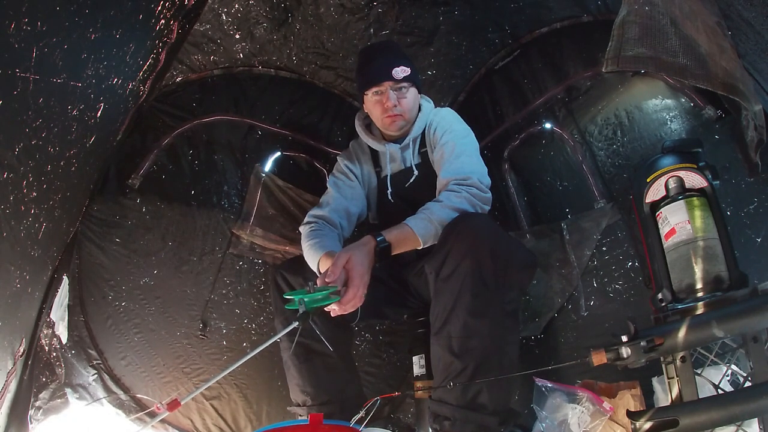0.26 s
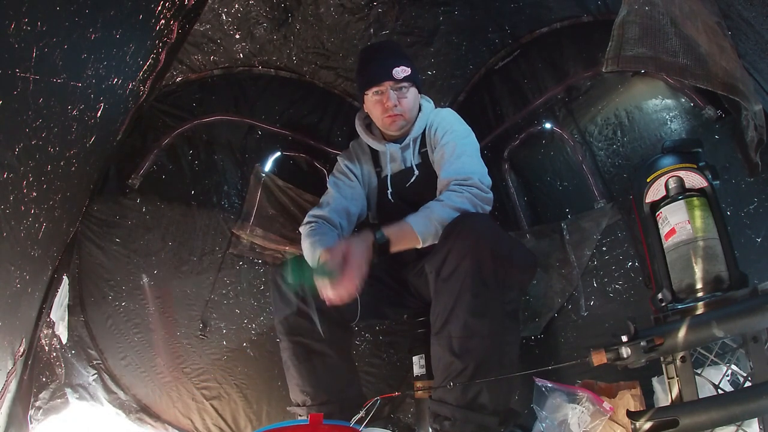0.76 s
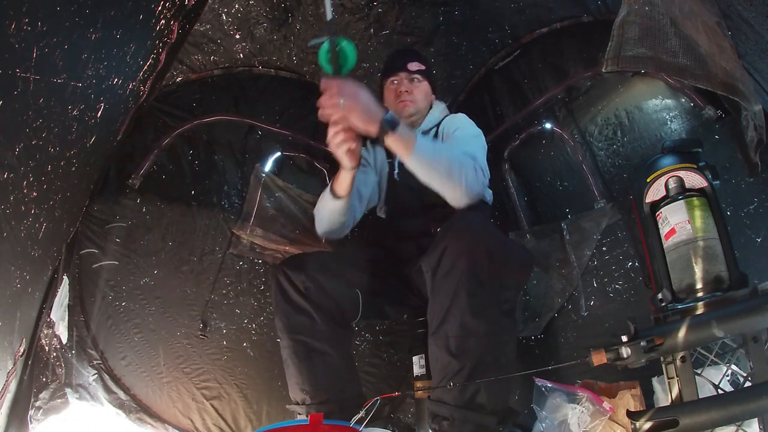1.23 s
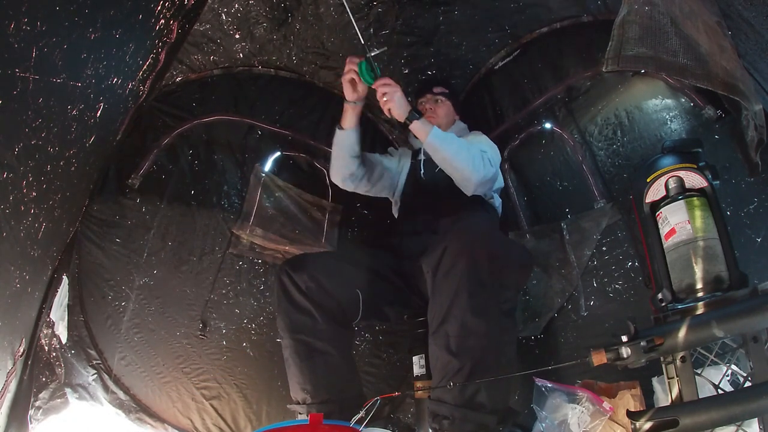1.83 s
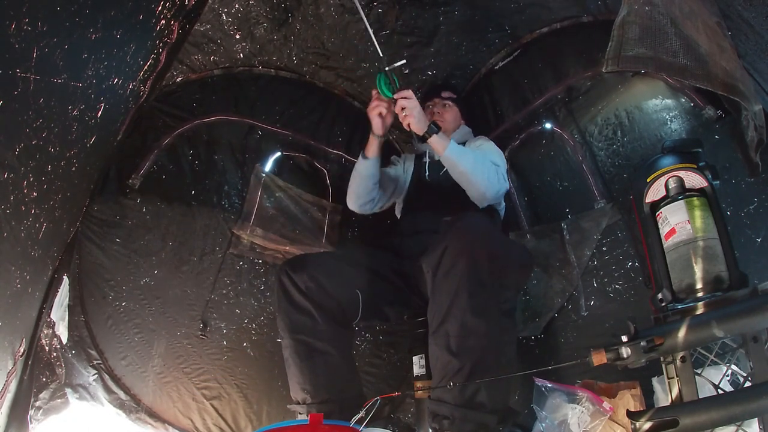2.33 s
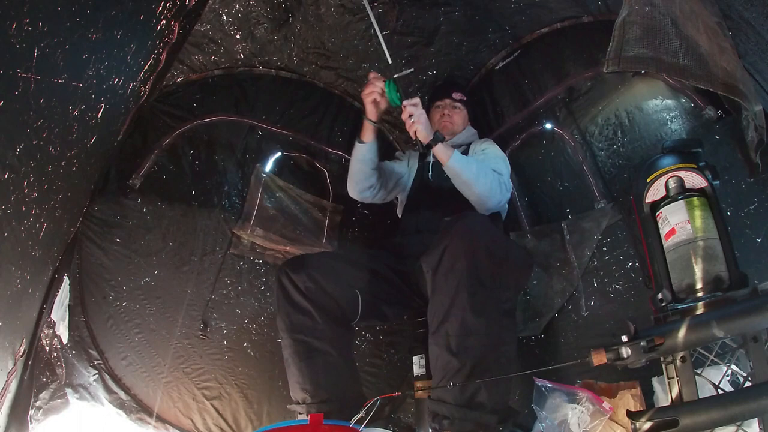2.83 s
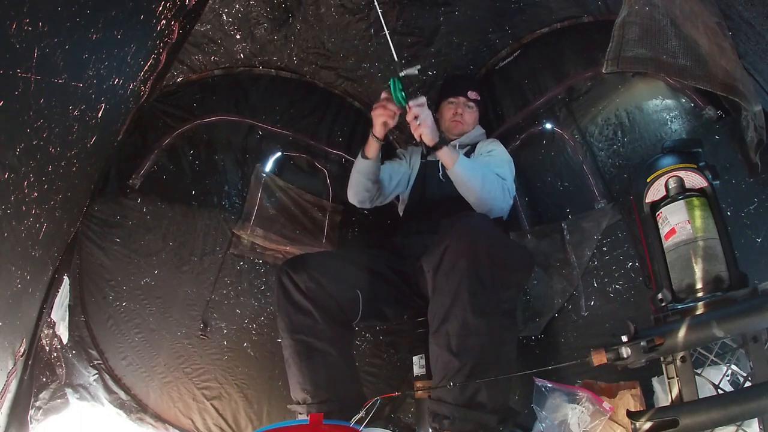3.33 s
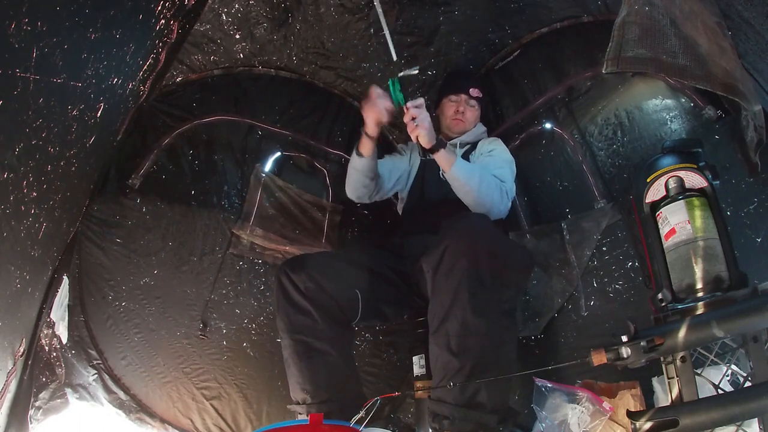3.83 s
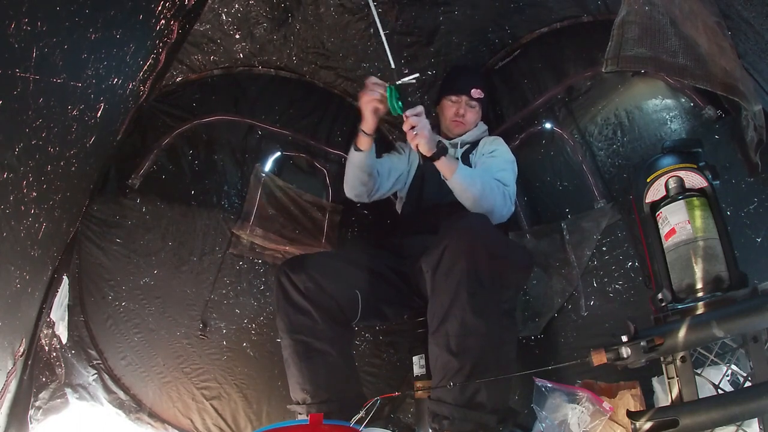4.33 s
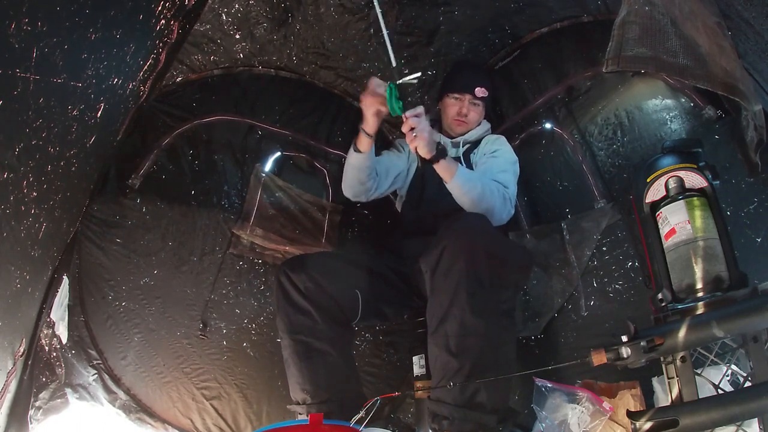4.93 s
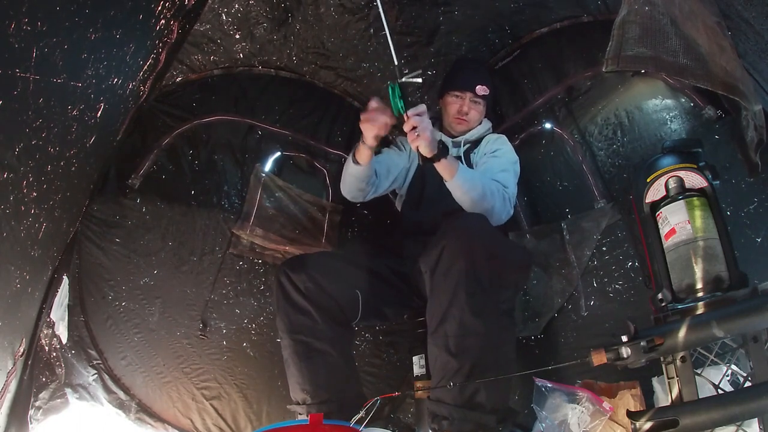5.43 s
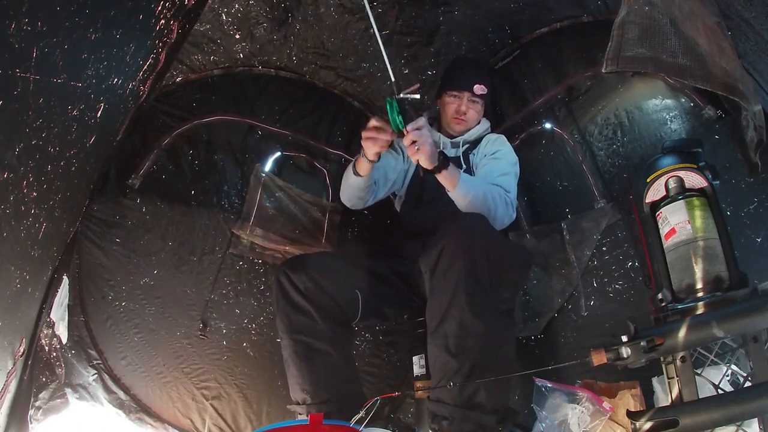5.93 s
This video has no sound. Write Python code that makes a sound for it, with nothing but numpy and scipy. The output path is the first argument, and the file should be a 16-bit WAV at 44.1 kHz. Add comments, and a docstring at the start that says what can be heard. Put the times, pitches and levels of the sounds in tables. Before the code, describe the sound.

A quiet fabric shelter heard close and dry in mono. A gas heater gives a soft, unsteady low rumble, a faint wavering hum, stronger at first, and barely audible hiss. At about 0.9 s a small fishing rod is lifted: a loud bright double click, a dull hand bump and a burst of sleeve rustle. A tiny squeak chirps at 1.2 s, with soft bumps around 1.5 s. A duller, woodier knock lands at 1.9 s, then scuffing swells from 2.1 to 2.4 s with a sharp click at 2.23. Fine gritty gear whir continues. Single crisp ticks come at 3.2 and 3.8 s, then a denser run from 4.1 to 4.5 s, strongest at 4.35. Further sharp clacks at 5.0, 5.4 and 5.65 s, each with a brief rattle; a muffled bump at 5.8 s, a faint squeak near 6.0 and a last tick at 6.1 s as the winding fades.

```python
"""Small fishing reel wound beside a gas heater

A reel is lifted and wound inside a fabric shelter, close to a mono camera microphone.
Heater: shaped noise rumble and hiss, plus a wavering low hum of sine and resonant noise.
Winding: gear whir, sleeve rustle and finger rub are gritty shaped noise with short scuffs.
Loose play knocks and chatters: impulses and noise bursts ring the reel's modes.
Hand bumps are noise puffs into the rod modes; squeaks are short sine bursts."""
import sys
import numpy as np
from scipy import signal
from scipy.fft import rfft, irfft, next_fast_len
from scipy.io import wavfile
from scipy.ndimage import uniform_filter1d, map_coordinates

SR = 44100
rng = np.random.default_rng(int(sys.argv[2]) if len(sys.argv) > 2 else 0)


def dump_mix(stems):
    """Bounce the given channels to the path in sys.argv[1] as a 16-bit WAV at rate SR."""
    frames = np.atleast_2d(stems).T  # one column per channel
    limited = np.clip(frames, -1, 1)  # hard clip at full scale
    pcm = np.round(limited * 32767).astype(np.int16)
    wavfile.write(sys.argv[1], SR, pcm)


N = 271964

# Burner rumble spectrum: (frequency [Hz], relative density [dB])
RUMBLE_SPECTRUM = [(12, -56), (20, -1.5), (50, -2.5), (75, -0.5), (100, -8), (122, -2), (145, -8),
                   (195, -7), (225, -15.5), (340, -26), (450, -45), (700, -100)]
# Rumble level: (time [s], mean level [dB])
RUMBLE_LEVEL = [(0, -54.5), (1.2, -52.5), (1.9, -56.5), (3.2, -51), (3.8, -55), (4.7, -52.5), (5.6, -56),
                (6.17, -54.5)]
# Air mode of the burner: (centre [Hz], width [Hz], level [dB])
HUM_MODE = [(170.2, 3.2, 1)]
# Hum level: (time [s], mean level [dB])
HUM_LEVEL = [(0, -56), (.7, -54.5), (1.6, -65.5), (4.4, -69), (5.9, -61), (6.17, -61)]
# Burner hiss spectrum in the shelter: (frequency [Hz], relative density [dB])
HISS_SPECTRUM = [(200, -9), (400, -10), (580, -19.5), (780, -7.5), (1000, -17.5), (1700, -20.5),
                 (2200, -20.5), (4000, -26), (5500, -21.5), (7900, -25), (8600, -32.5), (11400, -42),
                 (16000, -66)]
# Winding levels: (time [s], gear whir [dB], sleeve rustle [dB])
WINDING_LEVELS = [(.85, -65, -61), (.95, -56.5, -54.5), (1.1, -62.5, -60), (1.25, -62.5, -62),
                  (1.42, -56.5, -58), (1.65, -58.5, -60.5), (1.9, -61.5, -62.5), (2.25, -59.5, -68),
                  (2.5, -58.5, -66.5), (2.7, -60, -68), (3.05, -58, -64.5), (3.25, -60.5, -66.5),
                  (3.5, -59, -63.5), (3.75, -59.5, -64.5), (4.25, -57, -62.5), (4.5, -58.5, -63),
                  (4.65, -60.5, -70), (5.0, -61, -67.5), (5.6, -62.5, -67), (6.0, -63, -68.5),
                  (6.17, -71.5, -71)]
# Gear whir spectrum: (frequency [Hz], relative density [dB])
WHIR_SPECTRUM = [(2500, -30.5), (4000, -14), (4900, -6.5), (5500, -5.5), (6200, -4), (6700, 0.5),
                 (7250, -6), (8000, -14), (8800, -17), (11000, -27.5), (16000, -56)]
# Sleeve rustle spectrum: (frequency [Hz], relative density [dB])
RUSTLE_SPECTRUM = [(600, -33), (1200, -9), (1700, -4.5), (2400, -1.5), (3000, 0), (3800, -3.5), (5000, -4),
                   (7000, -18.5), (16000, -41)]
# Handle modes under the fingers: (centre [Hz], width [Hz], level [dB])
RUB_MODES = [(2664, 120, 12), (2930, 260, -6)]
# Scuffs, short swells of winding noise: (time [s], length [s], whir [dB], rustle [dB])
SCUFFS = [(1.148, 0.15, -67, -66), (1.806, 0.057, -62, -59), (2.09, 0.054, -52, -58.5),
          (2.192, 0.074, -49.5, -55.5), (2.298, 0.081, -53.5, -54.5), (2.376, .05, -58, -64.5),
          (2.733, 0.015, -57, -85), (3.644, 0.022, -65, -83), (3.954, 0.048, -57.5, -68),
          (4.044, 0.015, -60, -63), (4.894, .044, -60, -91), (5.826, 0.087, -75, -66.5),
          (5.968, 0.076, -67, -98)]
# Reel knocks: (time [s], loudest short rms of the ring [dB], spool centre [Hz], handle share [dB],
# handle centre [Hz], ring share [dB], chatter t60 [s])
KNOCKS = [(0.8876, -23.5, 6950, -12.5, 2690, -15.5, 0.093), (.9004, -37, 7160, -17, 2350, -5, 0.066),
          (0.9063, -38.5, 6000, -3, 1940, -3, 0.054), (1.236, -52.5, 6800, -10, 2730, -23, 0.095),
          (1.6717, -56, 6020, -10, 2920, 3, 0.06), (1.7121, -49.5, 5850, -29, 2980, -24, .09),
          (1.8115, -50.5, 5740, 14.5, 2370, 0, .06), (1.9208, -26.5, 4350, 14, 2770, 8, .055),
          (1.931, -33, 7000, -6.5, 2940, -8, 0.1), (2.2318, -25, 6700, -17.5, 2240, -12, 0.1),
          (2.2399, -36, 6400, -30, 2320, -17, 0.12), (3.01, -48.5, 6290, -9, 2760, -15, 0.17),
          (3.2274, -27, 7130, -19.5, 2550, -8.5, .1), (3.241, -44, 7180, -18, 2570, -3, 0.12),
          (3.6441, -51.5, 5700, -22, 2750, -21, .08), (3.76, -30, 7400, -20, 2500, -15, 0.1),
          (4.0661, -32.5, 7400, -16.5, 2600, -10, .1), (4.1069, -39, 6600, -23, 2650, -10, 0.11),
          (4.2187, -51, 6650, -19, 2580, -16, 0.066), (4.2993, -34, 7140, -35, 2160, -21, 0.089),
          (4.353, -27.5, 6760, -22, 2560, -15, 0.1), (4.3677, -31.5, 6100, -20, 2570, -14, 0.078),
          (4.473, -42, 6300, -20, 2300, -19, .05), (4.9008, -53.5, 6480, -19, 2500, -21, .07),
          (4.9973, -25, 6160, -18, 2190, -14, 0.085), (5.033, -38.5, 6370, -20, 2770, -8.5, 0.13),
          (5.0602, -53, 6560, -7, 2610, -1, 0.11), (5.1591, -51, 6700, -15, 2600, -13, 0.15),
          (5.3877, -24, 6930, -13, 2670, -9.5, 0.059), (5.4008, -32, 7420, -9, 2600, -19, 0.044),
          (5.4112, -31.5, 6200, -14.5, 2490, -15, 0.11), (5.552, -50.5, 7050, -34, 2390, -28, .097),
          (5.6449, -29, 7240, -14.5, 3200, -13.5, .11), (5.9758, -57, 4300, -12, 2900, -6, 0.042),
          (6.0761, -32, 7000, -20, 2600, -21, .11)]
# Reel modes: (centre [Hz], width [Hz], level [dB])
REEL_MODES = [(731, 42, -4.5), (1038, 23, -5.5), (1548, 88, -3), (1925, 104, 3.5), (2270, 133, 5),
              (2644, 74, 7.5), (2886, 117, 2.5), (3280, 42, 8), (4023, 190, -3.5), (4854, 170, -1.5),
              (5130, 205, 0), (5760, 194, 3.5), (6120, 250, 5.5), (6330, 334, 5.5), (7054, 247, 4.5),
              (7297, 166, 7), (8080, 280, 1), (8330, 180, -4), (8430, 430, 2), (9540, 310, -6.5),
              (9900, 320, -6)]
# Treble of a bare contact: (centre [Hz], width [Hz], level [dB])
CRACK_MODES = [(10300, 1300, 2), (13400, 2900, -19)]
# Dull bumps of hand on rod: (time [s], peak [dB], centre [Hz], force t60 [s])
BUMPS = [(.901, -34, 460, 0.012), (.954, -49.5, 820, 0.04), (1.014, -52, 485, 0.042),
         (1.508, -54.5, 705, 0.044), (1.552, -53.5, 740, 0.047), (1.585, -55, 690, 0.068),
         (2.73, -62, 900, 0.039), (3.593, -53, 910, 0.029), (5.286, -60.5, 507, 0.05),
         (5.822, -43, 634, 0.048)]
# Rod butt modes: (centre [Hz], width [Hz], level [dB])
ROD_MODES = [(120, 35, -14), (214, 92, 2), (396, 80, 1), (505, 260, -9.5), (740, 81, -4.5),
             (1090, 180, -9.5), (1440, 240, -6.5)]
# Handle squeaks: (time [s], peak [dB], pitch [Hz], length [s])
SQUEAKS = [(1.217, -50, 2700, .015), (1.236, -42, 2710, 0.034), (1.237, -52.5, 1660, 0.013),
           (1.238, -51, 4320, .012), (1.87, -57, 2750, 0.035), (2.51, -54.5, 2370, 0.023),
           (5.875, -56, 1450, 0.01), (5.976, -52.5, 4080, 0.014)]

RUMBLE_SWAY_DB, HUM_SWAY_DB, HISS_DB = 1.2, 1.9, -69.5
LIFT_S, LIFT_RISE_S = 0.85, 0.01  # the rod leaves rest
RUB_DB, RUB_SWAY_DB = -13.5, 2  # fingers on the handle, relative to the whir
GRIP_DB = -2  # a scuff also drags the fingers over the handle: relative to its rustle
REBOUND_RATE_HZ, REBOUND_DB, REBOUND_T60_S = 480, 18.0, 0.037
SEAT_DB, SEAT_FOLLOWS = -9.5, 0.5  # seat share; growth with the handle share [dB per dB]
CRACK_DB = -11.5  # gain relative to the knock level
TOP_HZ = 15900


def amp(db):
    """Gain of a level in dB."""
    return 10 ** (np.asarray(db) / 20)


def unit(x):
    """x at rms 1."""
    return x / np.sqrt(np.mean(x ** 2) + 1e-20)


def curves(rows):
    """One value per sample for each column after the time."""
    time_s, *columns = np.transpose(rows)
    return [np.interp(np.arange(N) / SR, time_s, column) for column in columns]


def wobble(rate_hz, size=N):
    """Smooth random curve, rate_hz knots a second."""
    knots = rng.standard_normal(int(size * rate_hz / SR) + 4)
    return map_coordinates(knots, [np.arange(size) * rate_hz / SR])


def filtered(x, response):
    """x times a complex response of frequency."""
    m = next_fast_len(len(x) + 8192)  # padding takes the ring-out
    spectrum = rfft(x, m) * response(np.fft.rfftfreq(m, 1 / SR))
    return irfft(spectrum, m)[:len(x)]


def coloured(x, points):
    """x shaped by (Hz, dB) points on a log-frequency axis, at rms 1."""
    f, db = np.transpose(points)

    def response(hz):
        return amp(np.interp(np.log(hz + 1), np.log(f + 1), db))
    return unit(filtered(x, response))


def resonant(modes):
    """Causal response of (Hz, width Hz, dB) resonances summed with alternating sign."""
    def response(f):
        total = 0
        for k, (centre, width, db) in enumerate(modes):
            damping = 1j * f * width
            total = total + (-1) ** k * amp(db) * damping / (centre ** 2 - f ** 2 + damping)
        return total
    return response


def patchy(patchy_db):
    """Noise with patches of random gain in time and frequency."""
    z = signal.stft(rng.standard_normal(N), nperseg=512)[2]
    field = uniform_filter1d(rng.standard_normal(z.shape), size=6, axis=0)
    field = uniform_filter1d(field, size=10, axis=1)
    return signal.istft(z * amp(patchy_db * unit(field)), nperseg=512)[1][:N]


def add(track, s, sound):
    """Mixes a sound into the track from time s on."""
    part = track[round(s * SR):][:len(sound)]
    part += sound[:len(part)]


def heater():
    """The flame rumbles unevenly, sings in one low air mode and hisses faintly."""
    rumble_db = curves(RUMBLE_LEVEL)[0] + RUMBLE_SWAY_DB * wobble(3.976)
    rumble = amp(rumble_db) * coloured(rng.standard_normal(N), RUMBLE_SPECTRUM)
    pitch_hz = HUM_MODE[0][0] * (1 + 0.01246 * wobble(4))
    tone = np.sin(2 * np.pi * np.cumsum(pitch_hz) / SR)
    breath = unit(filtered(rng.standard_normal(N), resonant(HUM_MODE)))
    hum_db = curves(HUM_LEVEL)[0] + HUM_SWAY_DB * wobble(3.94)
    hum = amp(hum_db) * (0.8 * tone + 0.62 * breath)
    hiss = amp(HISS_DB) * coloured(patchy(patchy_db=2.0), HISS_SPECTRUM)
    return rumble + hum + hiss


def winding():
    """Gear teeth, cloth fibres and fingers make dense gritty noise, still until the rod is lifted."""
    whir, rustle = amp(curves(WINDING_LEVELS))
    rub = whir * amp(RUB_DB + RUB_SWAY_DB * wobble(16))
    whir *= amp(1.2 * wobble(8))
    for s, length_s, whir_db, rustle_db in SCUFFS:
        u = np.linspace(0, 1, round(length_s * SR))
        swell = np.sin(np.pi * u ** 0.61)  # quick to rise, slower to fall
        catch_db = 1.8 * wobble(116, size=len(u))  # cloth catches and slips
        add(whir, s, amp(whir_db) * swell)
        add(rub, s, amp(rustle_db + GRIP_DB) * swell)
        add(rustle, s, amp(rustle_db + catch_db) * swell)
    moving = np.clip((np.arange(N) / SR - LIFT_S) / LIFT_RISE_S, 0, 1)
    gears = coloured(patchy(patchy_db=1.5) * amp(0.83 * wobble(300)), WHIR_SPECTRUM)
    cloth = coloured(patchy(patchy_db=3.0) * amp(0.28 * wobble(150)), RUSTLE_SPECTRUM)
    finger_force = rng.standard_normal(N) * amp(3.1 * wobble(12))
    fingers = unit(filtered(finger_force, resonant(RUB_MODES)))
    return moving * (whir * gears + rustle * cloth + rub * fingers)


def knocks():
    """A hard blow, its rebounds and a dying chatter of tiny contacts ring the reel's modes."""
    out, t = np.zeros(N), np.arange(SR // 6) / SR
    hz, width_hz, level_db = np.transpose(REEL_MODES)
    for s, db, spool_hz, handle_db, handle_hz, ring_db, t60_s in KNOCKS:
        # one impulse at the start, then one per turn of an uneven clock
        rate_hz = REBOUND_RATE_HZ * amp(3 * wobble(200, size=len(t)))
        turns = np.floor(np.cumsum(rate_hz) / SR)
        rebound_db = REBOUND_DB + 0.87 * rng.standard_normal(len(t)) - 60 * t / REBOUND_T60_S
        rebounds = np.diff(turns, prepend=-1) * amp(rebound_db)
        chatter = amp(0.96 * wobble(312, size=len(t)) - 60 * t / t60_s)
        chatter *= 1 - np.exp(-t / 0.00074)
        # spool and handle ring most near the mode closest to the contact; the seat follows the handle
        spool_db = -14 * np.abs(np.log2(hz / spool_hz))
        near_db = handle_db - 30 * np.abs(np.log2(hz / handle_hz))
        seat_db = SEAT_DB + SEAT_FOLLOWS * handle_db
        share_db = np.select([hz < 1700, hz < 3050, hz < 3600], [seat_db, near_db, ring_db], spool_db)
        scatter_db = 2 * rng.standard_normal(len(hz))
        modes = resonant(np.transpose([hz, width_hz, level_db + share_db + scatter_db]))
        force = rebounds + chatter * rng.standard_normal(len(t))
        knock = filtered(force, lambda f: modes(f) / (1 + 1j * f / 9500) ** 3)
        loudest = np.sqrt(uniform_filter1d(knock ** 2, size=400).max())
        # the contact itself cracks above the modes, less when the handle takes the blow
        crack = filtered(chatter ** 1.14 * rng.standard_normal(len(t)), resonant(CRACK_MODES))
        crack *= amp(CRACK_DB - 1.9 * max(handle_db, 0))
        add(out, s - 0.0005, amp(db) * (knock / loudest + crack))
    return out


def bumps():
    """A soft contact is a short puff of force into the rod modes, strongest near its centre."""
    out, t = np.zeros(N), np.arange(SR // 8) / SR
    hz, width_hz, level_db = np.transpose(ROD_MODES)
    for s, db, centre_hz, t60_s in BUMPS:
        puff = rng.standard_normal(len(t)) * amp(-60 * t / t60_s) * (1 - np.exp(-t / 0.017))
        near_db = level_db - 9 * np.abs(np.log2(hz / centre_hz))
        bump = filtered(puff, resonant(np.transpose([hz, width_hz, near_db])))
        add(out, s - 0.002, amp(db) * bump / np.abs(bump).max())
    return out


def squeaks():
    """A dry bearing sticks and slips at a nearly steady rate for an instant: a sine burst."""
    out = np.zeros(N)
    for s, db, hz, length_s in SQUEAKS:
        t = np.arange(round(length_s * SR)) / SR
        pitch_hz = hz * (1 + 0.0038 * wobble(130, size=len(t)))
        swell = np.sin(np.pi * (t / length_s) ** 0.5)
        add(out, s, amp(db) * swell * np.sin(2 * np.pi * np.cumsum(pitch_hz) / SR))
    return out


def scene():
    """One microphone feeds both channels."""
    mono = heater() + winding() + knocks() + bumps() + squeaks()
    return np.array([mono, mono])


def record(dry):
    """The camera's band limit: a steep zero-phase low-pass."""
    return np.array([filtered(x, lambda hz: 1 / (1 + (hz / TOP_HZ) ** 160)) for x in dry])


dry = scene()
out = record(dry)
dump_mix(out)
```